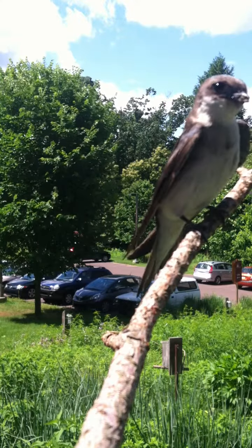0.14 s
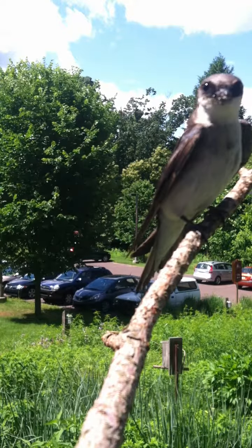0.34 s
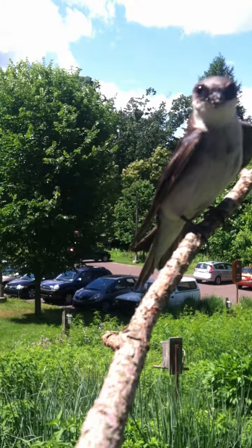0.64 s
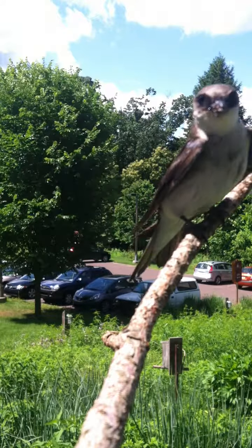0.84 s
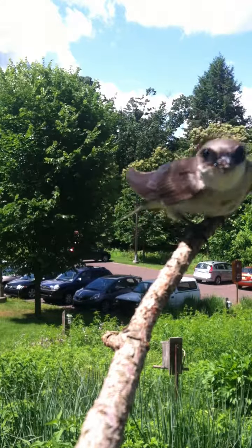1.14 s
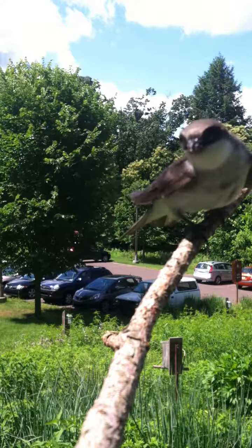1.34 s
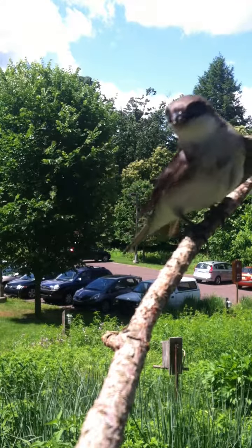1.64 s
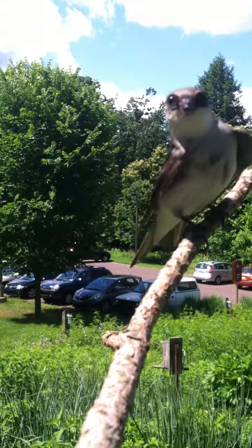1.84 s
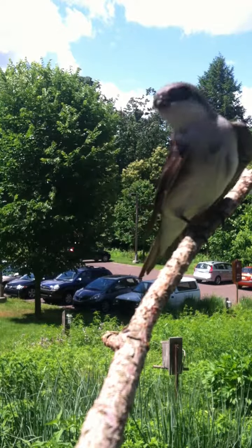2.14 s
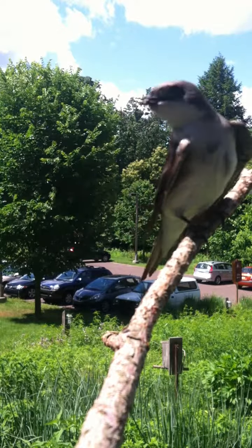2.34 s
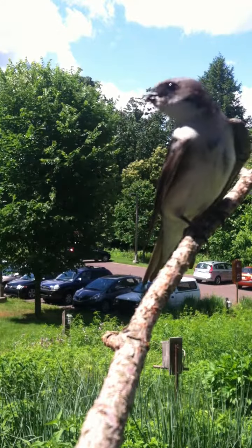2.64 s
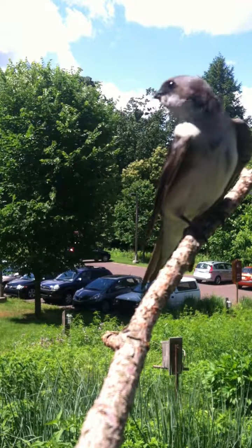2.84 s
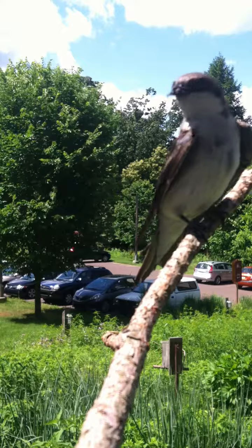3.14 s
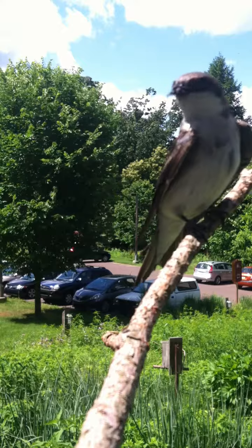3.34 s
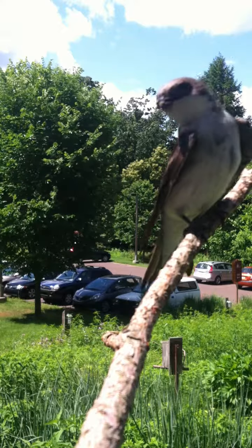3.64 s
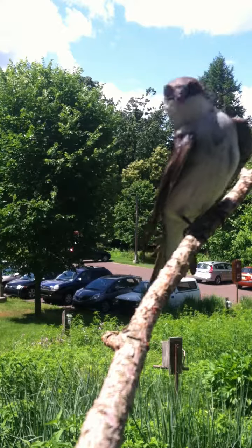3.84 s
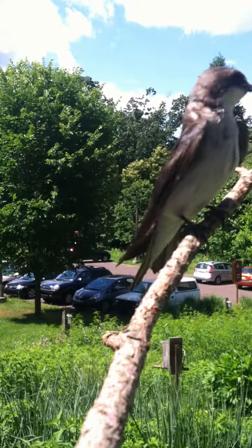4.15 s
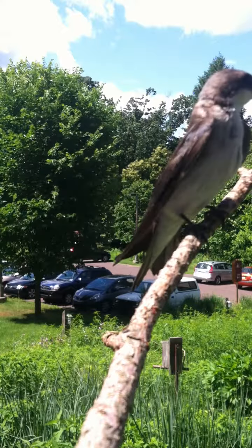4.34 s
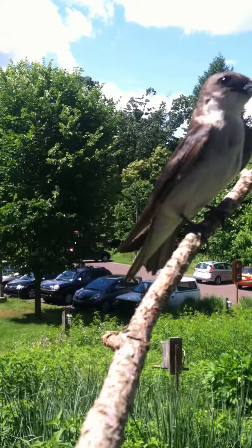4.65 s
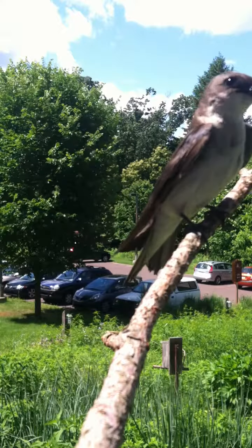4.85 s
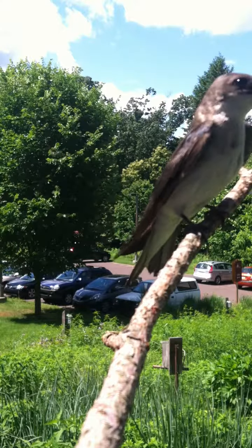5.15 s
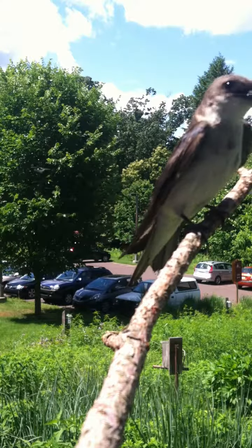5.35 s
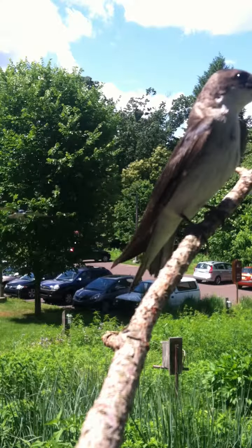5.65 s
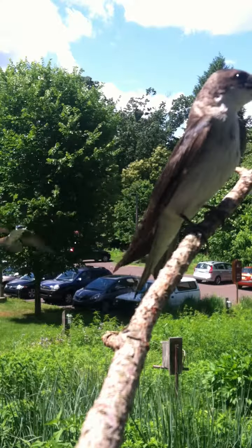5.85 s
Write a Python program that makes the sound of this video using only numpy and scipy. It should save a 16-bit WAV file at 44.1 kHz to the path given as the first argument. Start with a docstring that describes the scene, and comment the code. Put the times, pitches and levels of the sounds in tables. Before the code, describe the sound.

Swallows twitter close to the microphone in quick, chattering bursts of high falling chirps, over a faint outdoor wash of distant traffic.

```python
"""Swallows twittering on a perch

Swallows perched close to a small microphone twitter in bursts of fast whistles, each a gliding near sine.
Random faint falling glides give a grainy texture, patchy noise rises and falls with the calls
and a short sparse echo follows. Far behind lie traffic wash and a low rumble, both shaped noise,
and an engine hum of two sines.
A few far whistles are narrow bands of noise; one soft thud through the perch is a brief low cosine.
"""
import sys
import numpy as np
from scipy import signal
from scipy.io import wavfile
from scipy.ndimage import uniform_filter1d

SR = 44100
rng = np.random.default_rng(int(sys.argv[2]) if len(sys.argv) > 2 else 0)


def unload_audio(sound):
    """Save the sound as a 16-bit wav file, at the path given as the first command line argument."""
    columns = np.transpose(np.atleast_2d(sound))
    # keep every value between -1 and 1, then stretch to whole-number steps
    steps = np.round(np.clip(columns, -1, 1) * 32767)
    wavfile.write(sys.argv[1], SR, steps.astype(np.int16))


def gain_from_db(level_db):
    """Convert decibel levels to linear amplitude factors (20 dB per decade)."""
    decades = np.asarray(level_db, float) / 20
    return 10 ** decades


N = 264159  # length of the scene in samples

# clear whistled sweeps, most close to the microphone, the soft runs near 3.3-3.5 s and 4.0-4.7 s # from a bird
# further off; level before colour and flutter: # (start [s], length [ms], from pitch [Hz], to pitch [Hz], level
# [dB])
WHISTLES = [(0.0, 11.0, 3990, 3300, -30.5), (0.003, 23.4, 5490, 4150, -31.0),
            (0.0221, 16.7, 4070.0, 3570, -32), (0.024, 16.0, 8380.0, 6700, -38.5),
            (0.0429, 8.8, 8500, 6400, -39), (0.0573, 7.6, 3950, 3700, -40), (0.238, 8.9, 3450, 3580, -51),
            (0.2769, 11.0, 5360, 4110, -19), (0.2824, 10, 3730, 3280, -31), (0.3014, 5.2, 5156, 4340, -17),
            (0.301, 11.0, 4150, 3210, -25.5), (0.313, 10.6, 5050, 4440, -24), (0.323, 6.6, 4640, 3240, -25),
            (0.341, 19, 2870, 2110, -60.5), (0.427, 14.5, 4900, 4500, -29.5), (0.434, 9, 4270, 3240, -27),
            (0.4522, 8, 5450, 4280, -24.5), (0.4615, 10.6, 4770, 4620, -23), (0.4699, 6.7, 4450, 3140, -26),
            (0.4834, 12.6, 5330.0, 4220, -24.5), (0.4933, 15.3, 3810.0, 3330.0, -38.0),
            (0.5214, 10.4, 4690.0, 4360.0, -38), (0.5315, 10, 4310.0, 4270, -41),
            (0.5446, 7.4, 3470, 2620, -40.5), (0.5512, 15, 5470, 3920, -36.5),
            (0.578, 11.0, 3640, 2600, -45), (0.754, 16.0, 3420, 3500, -50),
            (0.783, 8.6, 4480.0, 4450, -32.0), (0.799, 18, 4370, 2850, -32), (0.8084, 17, 6700, 4700, -28),
            (0.8263, 5.5, 5670, 3600, -26.5), (0.8297, 12.7, 4880, 3870.0, -42),
            (0.8405, 14, 3465, 3460, -38), (0.921, 9.9, 4380, 3180, -39.5), (0.924, 13, 7800, 6220, -43),
            (0.9393, 18, 3910, 3200, -32.5), (0.9479, 15, 6640, 4970, -31),
            (0.9634, 16.5, 3450, 3510, -36.5), (0.977, 16.6, 5400, 3910, -30.5),
            (0.9923, 26.5, 3450.0, 3440, -40), (1.0004, 20.7, 7640, 5150, -44.0),
            (1.2036, 14.5, 4320, 3920, -43), (1.2167, 17.3, 5450, 4090, -35.5),
            (1.2314, 19, 4160, 4130.0, -47), (1.2463, 10, 3660, 2530, -44), (1.254, 19, 4400, 4020, -50.5),
            (1.3399, 31, 6170.0, 5420, -38.5), (1.3469, 16.0, 8040.0, 7560.0, -47.0),
            (1.3634, 8.6, 4280, 3770, -30), (1.3718, 9.7, 7220, 5150, -36.0),
            (1.388, 7.0, 5640, 3660.0, -34), (1.4768, 7.4, 3750.0, 3730, -44),
            (1.5178, 12.3, 5110, 4280, -18.5), (1.5313, 8, 5680, 3400, -23.5),
            (1.5425, 7.0, 5600, 4300, -19), (1.5453, 11.3, 3880, 3250, -30.5),
            (1.5588, 9.4, 4550, 3100, -22.0), (1.5916, 7.0, 3890.0, 2540, -52),
            (1.6098, 6.4, 3730, 2430, -42), (1.616, 11.5, 5560, 3890, -35.5),
            (1.646, 8.5, 5360.0, 4300, -30.5), (1.6569, 13, 4720, 4760, -25.5),
            (1.6657, 8.4, 4530, 3150, -24.5), (1.6834, 4.2, 5300, 4410, -24.5),
            (1.6909, 12.5, 5053, 4470, -20), (1.7024, 6.1, 4300, 3310, -27.0),
            (1.712, 16.6, 4470, 3030, -29.5), (1.7267, 4.55, 6150, 5780, -27),
            (1.817, 19.7, 3650, 2670, -42), (1.8243, 7.0, 6500, 5680.0, -30.5),
            (1.8383, 9.6, 4430, 2720, -35), (1.8465, 10.5, 6740, 5220.0, -27),
            (1.86, 16.8, 4680, 2980, -28), (1.8713, 11.3, 6200, 5700, -33), (2.1889, 15, 3730, 3190, -44.5),
            (2.2004, 14, 4620, 4130, -37), (2.2145, 9.7, 3450, 3440, -33), (2.22, 12.6, 5010, 4440, -25),
            (2.235, 7.6, 3680, 3320, -28), (2.243, 11.0, 6000, 3620, -23.0),
            (2.2635, 9.3, 3850, 3730, -31.5), (2.2738, 13, 3650, 3340, -41.5),
            (2.358, 12.2, 4300, 3060, -34), (2.362, 4.3, 7760, 5300, -32), (2.371, 10.8, 5050, 4920, -34),
            (2.3864, 9, 4180, 2370, -42), (2.3945, 19, 4765, 2210, -42.5),
            (2.4033, 13.5, 7640, 4610, -39.5), (2.5469, 9.4, 4840, 3530, -35.5),
            (2.564, 8.9, 4430, 2800, -34.5), (2.568, 15, 6840.0, 5090, -28),
            (2.5875, 15.3, 4830, 3050, -29.5), (2.5968, 11, 7430, 5030, -34.5),
            (2.665, 15, 3910, 3480, -37.5), (2.6732, 5.9, 6800, 5330, -31),
            (2.6839, 7.0, 4670, 2930, -34.5), (2.6905, 9.4, 6710, 5030.0, -25.5),
            (2.7006, 22.7, 4680, 3220, -29), (2.7206, 16, 6310, 5820, -32), (2.896, 13, 7360, 5350, -39.0),
            (2.8968, 5.8, 3640, 3140, -36.5), (2.909, 17, 5160, 4980, -28.5),
            (2.9216, 14.5, 4550, 4250, -30.5), (2.9283, 23.6, 6330.0, 3090, -34),
            (2.9368, 5.5, 3500, 3264, -31), (2.944, 12.7, 5850, 4680, -27.5), (2.9588, 10, 4000, 2900, -35),
            (3.013, 13, 6740, 5900, -37.5), (3.0269, 18.7, 5810, 2710, -31.0),
            (3.042, 15, 4080, 3730, -31.5), (3.0529, 12, 6720, 5220.0, -29.5),
            (3.0654, 10, 5100, 4340, -29.5), (3.083, 7.0, 7440, 5740, -45.5),
            (3.0913, 13, 4280, 2760, -41.5), (3.0967, 11.0, 7600, 5800, -50),
            (3.1417, 7.3, 3620, 2080, -45.0), (3.3585, 7.0, 5260, 3350.0, -50),
            (3.3705, 4.7, 4470.0, 3970, -47), (3.3784, 16.6, 4920, 2710, -54.5),
            (3.408, 8.7, 4200, 3820, -44.5), (3.4227, 6.7, 5340, 2820.0, -48.5),
            (3.4317, 7.5, 5700, 3000.0, -50), (3.4404, 9.7, 4500, 2520, -47),
            (3.456, 23, 3230, 1780, -55.5), (3.512, 5.8, 3710, 3660.0, -47),
            (3.5424, 12.8, 5100, 4600, -20.5), (3.55, 8.3, 4300, 3110, -26),
            (3.5682, 8.2, 5330, 4100, -21.5), (3.576, 16.5, 5160, 4380, -21),
            (3.5867, 9.6, 4020, 2910, -27), (3.5978, 27, 4290.0, 2710, -36),
            (3.5988, 11.0, 5250, 4550, -23), (3.6777, 8.1, 4500, 4480, -46),
            (3.7009, 6.2, 4280, 3540, -33.5), (3.7118, 12.6, 4350, 3360, -24.5),
            (3.7238, 35.3, 6270, 3650, -35), (3.7797, 10.5, 5360, 4700, -51),
            (3.798, 26, 5770, 3960, -49.5), (3.9, 14, 3200, 2590, -51.5), (3.9197, 9.9, 3640, 3670, -34),
            (3.9299, 12, 3790, 3310, -39), (3.9457, 23.7, 4690, 3784, -25.5), (3.9834, 6, 4990, 3800, -31),
            (3.9902, 6.7, 4270.0, 2420, -35.5), (4, 9.3, 3680, 3300, -44),
            (4.031, 7.6, 3250, 3060.0, -48.5), (4.0555, 23, 4410, 3610, -39),
            (4.0823, 17, 3680, 3280, -46.0), (4.1009, 8.2, 5060, 3500, -41.5),
            (4.112, 7.6, 5330, 3740, -49), (4.1168, 13.6, 3350.0, 3040, -46.5),
            (4.1423, 10.5, 4000, 3260, -46.5), (4.158, 7.3, 5500, 3870, -54),
            (4.162, 12.6, 4770.0, 4420, -45.5), (4.1755, 7.0, 5440, 2110.0, -45),
            (4.1856, 6.2, 4260, 1830.0, -46.5), (4.206, 20, 3210, 3220, -54.5),
            (4.2587, 14, 3910, 3320, -55.5), (4.2773, 8.2, 2560, 2580.0, -55.5),
            (4.3012, 24.0, 3190.0, 3230, -57), (4.352, 16.0, 3770, 3330.0, -56.5),
            (4.363, 14, 3160, 2300, -58.5), (4.39, 21, 3070, 3110, -55.5),
            (4.5457, 11.0, 4370, 3930.0, -52), (4.5644, 7.0, 3170, 2950.0, -41.5),
            (4.5652, 15, 6200, 3960, -41), (4.583, 15, 4420.0, 4000, -44.5),
            (4.5974, 9.1, 3420, 2700, -41.5), (4.601, 9.9, 5430.0, 3680, -40),
            (4.6188, 10, 3520.0, 3160, -46), (4.6348, 15, 3720, 3340, -46.5),
            (4.662, 8.4, 5700, 3130, -39.5), (4.6812, 7.6, 5220, 1870, -43), (4.716, 5.5, 4670, 2820, -49),
            (4.7474, 12, 4320, 3390, -32.5), (4.7689, 12.8, 4660, 3160, -30),
            (4.7828, 27, 4170, 3570, -34.0), (4.789, 7.8, 5360, 4760, -30),
            (4.7955, 6.2, 5520, 4210, -24.5), (4.8804, 11.0, 4300, 3180, -37.5),
            (4.8964, 15.4, 4236, 3270, -29), (4.896, 8.4, 8370, 4740, -39), (4.9073, 10, 3150, 2850, -35),
            (4.921, 21.7, 5130.0, 4270, -39.5), (4.9552, 11.0, 5500.0, 4430, -56),
            (4.9962, 15, 4014, 3140, -33.5), (5.0164, 18.3, 4990, 3840, -28),
            (5.0292, 15.6, 4570, 4230, -24), (5.0493, 11.0, 5270, 5300, -43),
            (5.0595, 8.8, 4980, 4040, -28.5), (5.0623, 23, 3780, 3240, -46.5),
            (5.1314, 12, 6550, 5760, -45), (5.146, 9.2, 3950, 3580.0, -41.5), (5.1525, 25, 6040, 4540, -44),
            (5.1857, 7.7, 4010, 3580.0, -47.5), (5.2507, 16.0, 4600, 3630, -43),
            (5.2676, 10.7, 5630, 3950, -31), (5.2829, 19, 4150, 3620, -27.5), (5.299, 7.0, 6290, 5640, -35),
            (5.3075, 11.7, 5290, 4290, -28.5), (5.3305, 7.5, 5720, 3930, -43),
            (5.3393, 7.7, 3600, 2990.0, -50), (5.348, 15, 4040, 2370, -49.5), (5.3596, 15, 5100, 4160, -53),
            (5.362, 19, 2770, 1820, -58), (5.4819, 10, 3300, 2580, -58.5),
            (5.4929, 15, 3750.0, 2780, -53.5), (5.9269, 11.6, 4140, 3394, -34),
            (5.9513, 6.2, 5310, 3970, -39), (5.9554, 9.5, 4020, 3800.0, -39),
            (5.9778, 12, 4210.0, 3200, -43)]


def swallows(overtone_db=-20):
    """Each whistle is a short sweep that runs on faintly past both its ends."""
    run_on, tail_db, lead_db = 0.55, -22, -23  # share of the length; faint glides after and before
    lowest_hz = 2300  # the glide after a sweep stops here unless the sweep itself ends lower
    out = np.zeros(N)
    for s, ms, from_hz, to_hz, db in WHISTLES:
        octave_db = overtone_db + burst(s + 0.005)[1]
        add(out, s, sweep(ms, from_hz, to_hz, db, octave_db))

        # faint glides out of and into the middle of the sweep
        long_ms = 2 * run_on * ms
        glide_hz = 2 * run_on * (from_hz - to_hz)
        middle_s = s + ms / 2000
        middle_hz = (from_hz + to_hz) / 2
        end_hz = max(middle_hz - glide_hz, min(lowest_hz, to_hz))
        add(out, middle_s, sweep(long_ms, middle_hz, end_hz, db + tail_db, octave_db))
        lead_s = middle_s - long_ms / 1000
        if lead_s > 0:
            add(out, lead_s, sweep(long_ms, middle_hz + glide_hz, middle_hz, db + lead_db, octave_db))
    return out


def grain(overtone_db=-20, scatter_s=0.034, late_s=0.0095, count=6):
    """Random faint falling glides scattered around each whistle as a grainy texture."""
    fall_hz_per_ms, faint_db = 125.5, -27  # steepness, level under the whistle
    lowest_hz, highest_hz = 2300, 7200  # base for the lower limits, and the highest start
    out = np.zeros(N)
    chance = rng.uniform(-1, 1, (len(WHISTLES), count, 3))
    for (s, ms, from_hz, to_hz, db), glides in zip(WHISTLES, chance):
        hiss_db, bright_db = burst(s + 0.005)
        middle_hz = (from_hz + to_hz) / 2
        for shift, move, strength in glides:
            top_hz = np.clip(middle_hz * (1.25 + 0.4 * move), lowest_hz + 900, highest_hz)
            low_hz = max(top_hz - fall_hz_per_ms * ms, lowest_hz + 400)
            glide_db = db + faint_db + hiss_db + 5 * strength
            glide_s = max(s + late_s + scatter_s * shift, 0)
            add(out, glide_s, sweep(ms, top_hz, low_hz, glide_db, overtone_db + bright_db))
    return voiced() * out


# how strongly beak and microphone pass each pitch: (frequency [Hz], gain [dB])
BEAK_AND_MICROPHONE = [(1800, 3.5), (2800, 2.5), (3600, 1.5), (4300, 0.5), (4900, 0.5), (6200, -3.5),
                       (7500, 2.5), (10000, -6.5)]


def sweep(ms, from_hz, to_hz, db, overtone_db, fall_db=-11):
    """A near sine gliding evenly, with an octave that fades by fall_db a kHz."""
    u = np.linspace(0, 1, round(ms * SR / 1000))
    hz = from_hz + (to_hz - from_hz) * u
    turn = 2 * np.pi * np.cumsum(hz) / SR
    octave = gain_from_db(overtone_db + fall_db * (hz - 3000) / 1000) * np.sin(2 * turn)
    swell = abs(np.sin(np.pi * u)) ** 1.05  # a higher power is more pointed
    return np.sqrt(2) * gain_from_db(db + read(BEAK_AND_MICROPHONE, hz)) * swell * (np.sin(turn) + octave)


# bursts of twitter; hiss level raises the patchy noise and faint glides, brightness the octave and
# treble noise: (start [s], length [s], hiss level [dB], brightness [dB])
TWITTER = [(0.0, 0.076, 12, 1.5), (0.24, 0.098, 0.5, -11.5), (0.42, 0.078, 0.5, -11), (0.519, .069, 6, 3.5),
           (0.773, 0.086, 9.5, 1.5), (0.921, 0.084, 11, 0.5), (1.188, 0.075, 6, 5), (1.323, 0.079, 14, -3),
           (1.49, 0.15, 4.5, -5), (1.644, 0.13, 6, -3), (1.823, 0.094, 7, -3), (2.178, 0.101, 9, -3),
           (2.348, 0.068, 7.8, -5), (2.55, 0.078, 4, -2.5), (2.666, 0.089, 6.5, -4.5), (2.886, .11, 8.5, 1),
           (3.008, .14, 11, 0), (3.322, .17, -10, -7), (3.512, 0.26, 2.5, -9.5), (3.68, .21, 10, -4),
           (3.901, .11, 9, -7), (4.041, 0.36, 3.5, -9), (4.55, 0.14, 6, 0), (4.723, 0.09, 9.5, -4),
           (4.84, 0.12, 8, -14), (4.983, .1, 6, -6.5), (5.123, 0.078, 10.5, -7), (5.25, 0.12, 8, 0.5),
           (5.465, 0.088, 8, 3), (5.925, .08, 13.5, 3)]


def burst(t):
    """Hiss level and brightness in dB of the burst that began last."""
    start, length, hiss_db, bright_db = np.transpose(TWITTER)
    last = np.maximum(np.searchsorted(start, t, "right") - 1, 0)
    return hiss_db[last], bright_db[last]


def voiced():
    """1 during a burst, 0 in the pauses, with edges of 3 ms."""
    t = np.arange(N) / SR
    sounding = sum((t >= start) & (t < start + length) for start, length, *colour in TWITTER)
    return uniform_filter1d(np.minimum(sounding, 1.), size=132)


# tilt of the noise that rises and falls with the calls: (frequency [Hz], gain [dB])
PATCHY_NOISE_TILT = [(400, -74.5), (1000, -28.5), (1900, -22), (2700, -11.5), (4000, -8), (6000, -15.5),
                     (8000, -28), (10000, -44), (12500, -47.5), (15500, -66)]


def patchy_noise(calls, spread_hz=1200, near_db=-7, wide_db=-6, bright_db=-5, patchy_db=4.5):
    """Noise computed from the spectrum of the calls, smoothed over some 40 ms and spilling into the treble."""
    hz, t, z = signal.stft(calls, SR, nperseg=512, noverlap=384)
    power = abs(z) ** 2
    held = uniform_filter1d(power, size=15, axis=1)
    near = gain_from_db(near_db) ** 2 * uniform_filter1d(held, max(round(spread_hz / hz[1]), 1), 0)
    wide = gain_from_db(wide_db) ** 2 * power.mean(0)  # pulses with each sweep
    whistled_high = held[(hz > 5800) & (hz < 8500)].sum(0)
    high = gain_from_db(bright_db) ** 2 * whistled_high * (hz > 6000)[:, None]

    a, b, patches = rng.standard_normal((z.shape[1], len(hz), 3)).T
    hiss_db, treble_db = burst(t)
    treble_share = np.clip((hz[:, None] - 6500) / 2000, 0, 1.5)
    gain_db = read(PATCHY_NOISE_TILT, hz)[:, None] + hiss_db + treble_db * treble_share
    gain_db = gain_db + patchy_db * smooth_patches(patches, 9, 5)
    size = np.sqrt(abs(near + wide + high)) * gain_from_db(gain_db)
    return voiced() * signal.istft((a + 1j * b) * size, nperseg=512, noverlap=384)[1][:N]


def echoes(calls, t60=0.06, db=-22):
    """Leaves and ground throw back a short sparse tail, falling 60 dB in t60 seconds."""
    t = np.arange(60, 6000, 22) + rng.integers(0, 22, 270)  # delays in samples
    taps = np.zeros(6100)
    taps[t] = rng.choice([-1., 1.], 270) * gain_from_db(-60 * t / SR / t60)
    return gain_from_db(db) * signal.fftconvolve(calls, taps / np.linalg.norm(taps))[:N]


# soft thud through the perch: (start [s], frequency [Hz], peak level [dB], length [s])
PERCH_THUD = [(1.289, 145, -42.5, 0.0175)]


def thud():
    """A low push of two or three cycles under a soft window."""
    out = np.zeros(N)
    for s, hz, db, length in PERCH_THUD:
        t = np.arange(round(length * SR)) / SR
        push = np.cos(2 * np.pi * hz * (t - length / 2))
        add(out, s, gain_from_db(db) * push * np.hanning(len(t)))
    return out


# far, held whistles, level before the fades:
# (start [s], length [s], frequency [Hz], width [Hz], level [dB])
FAR_WHISTLES = [(0.612, 0.14, 3260, 60, -73), (4.0, 0.51, 3098, 400, -60.5), (4.24, 0.14, 530, 17, -66),
                (4.818, 0.05, 3780, 90, -75), (5.277, 0.33, 1325, 74, -64.5)]


def far_whistles():
    """Narrow bands of noise: tones blurred by distance."""
    out = np.zeros(N)
    for s, length, hz, width_hz, db in FAR_WHISTLES:
        t = np.arange(round(length * SR)) / SR
        a, b = rng.standard_normal((SR, 2))[:len(t)].T
        r = np.exp(-np.pi * width_hz / SR)
        blur = signal.lfilter([1], [1, -2 * r, r * r], a + 1j * b)
        tone = evened((blur * np.exp(2j * np.pi * hz * t)).real)
        add(out, s, gain_from_db(db) * tone * signal.windows.tukey(len(t), 0.5))
    return out


# far engine: (time [s], firing rate before waver [Hz], hum level [dB], octave level [dB])
FAR_ENGINE = [(2.0, 69.7, -84.5, -84), (3.302, 73.2, -89, -67.5), (3.9, 83.3, -70.5, -68.5),
              (4.901, 79.5, -70.5, -62.5), (5.99, 87, -70, -74.5)]


def engine(waver=0.011):
    """Firing tone and octave, wavering slowly in pitch."""
    s, *columns = np.transpose(FAR_ENGINE)
    t = np.arange(N) / SR
    hz, hum_db, octave_db = (np.interp(t, s, c) for c in columns)
    turn = 2 * np.pi * np.cumsum(hz * (1 + waver * slow_noise(3000))) / SR
    return np.sqrt(2) * (gain_from_db(hum_db) * np.sin(turn) + gain_from_db(octave_db) * np.sin(2 * turn))


# spectrum of the low rumble: (frequency [Hz], relative density [dB])
RUMBLE_SPECTRUM = [(25, -34), (45, -29.5), (63, -32), (123, -3.5), (204, -5.5), (285, -0.5), (312, -3),
                   (345, -27), (450, -48.5)]
# its level at the microphone: (time [s], level [dB])
RUMBLE_COURSE = [(0, -63), (1.6, -61), (2.2, -62), (3, -61), (4.2, -59.5), (5.5, -58), (5.99, -59.5)]


def rumble():
    """Low noise shaped by a smooth spectrum, without patches."""
    return noise(RUMBLE_SPECTRUM, RUMBLE_COURSE, patchy_db=0.0, size=2048)


# spectrum of the far traffic: (frequency [Hz], relative density [dB])
TRAFFIC_SPECTRUM = [(250, -48.5), (380, -6.5), (800, -6.5), (1500, -8.5), (2100, -13), (3700, -18),
                    (5700, -28.5), (8400, -36.5), (11000, -42.5), (15500, -57.5)]
# its level at the microphone: (time [s], level [dB])
TRAFFIC_COURSE = [(0, -59.5), (0.698, -60), (1.148, -59), (1.501, -55), (1.901, -59), (2.5, -60.5),
                  (4, -60.5), (5.99, -60.5)]


def traffic_wash():
    """Far traffic as broad noise with slight drifting patches."""
    return noise(TRAFFIC_SPECTRUM, TRAFFIC_COURSE, patchy_db=0.8, size=1024)


def noise(spectrum, level, patchy_db, size):
    """Random short-time spectra with drifting patches, played on a level curve."""
    hz = np.fft.rfftfreq(size, 1 / SR)
    a, b, patches = rng.standard_normal((4 * N // size + 5, len(hz), 3)).T
    gain_db = read(spectrum, hz)[:, None] + patchy_db * smooth_patches(patches, 12, 12)
    z = (a + 1j * b) * gain_from_db(gain_db)
    sound = evened(signal.istft(z, nperseg=size, noverlap=3 * size // 4)[1][:N])
    return sound * gain_from_db(np.interp(np.arange(N) / SR, *np.transpose(level)))


def smooth_patches(x, bins, frames):
    """Random values smoothed over frequency and time, at rms 1."""
    return evened(uniform_filter1d(uniform_filter1d(x, bins, 0), frames, 1))


def slow_noise(samples):
    """Noise averaged twice over a run of samples, at rms 1."""
    return evened(uniform_filter1d(uniform_filter1d(rng.standard_normal(N), samples), samples))


def evened(x):
    """Scales to rms 1."""
    return x / np.sqrt(np.mean(x ** 2) + 1e-20)


def read(points, hz):
    """Reads a spectrum on a log-frequency axis."""
    f, value = np.transpose(points)
    return np.interp(np.log(hz + 1), np.log(f + 1), value)


def add(mix, s, sound):
    """Mixes a sound in at time s."""
    part = mix[round(s * SR):][:len(sound)]
    part += sound[:len(part)]


def scene():
    """Close birds with grain, patchy noise and echoes over the far background."""
    flutter_db = 2.7 * slow_noise(50)  # quick flutter in strength
    calls = (swallows() + grain()) * gain_from_db(flutter_db)
    near = calls + patchy_noise(calls) + echoes(calls)
    background = traffic_wash() + rumble() + engine() + far_whistles()
    return (near + background + thud())[None]


def band_limit(x):
    """A steep low-pass at the top of the band."""
    return signal.sosfilt(signal.butter(12, 15700, fs=SR, output="sos"), x)


def record(dry):
    """Takes the finished mix at the microphone."""
    return band_limit(dry)


dry = scene()
out = record(dry)
unload_audio(out)
```